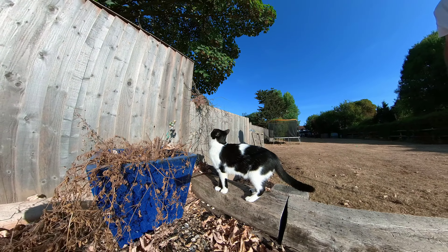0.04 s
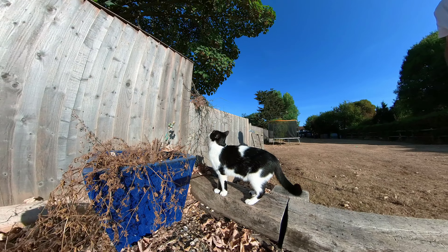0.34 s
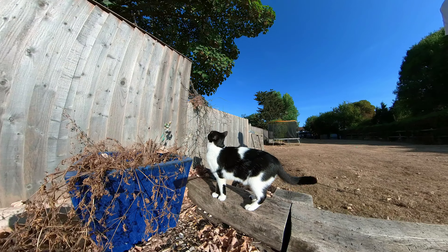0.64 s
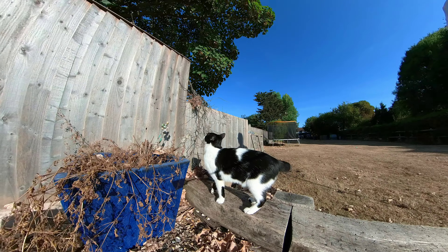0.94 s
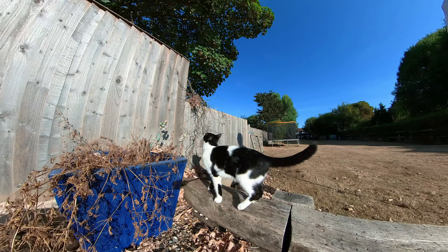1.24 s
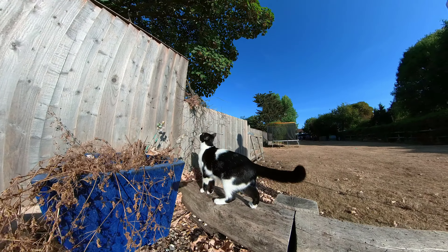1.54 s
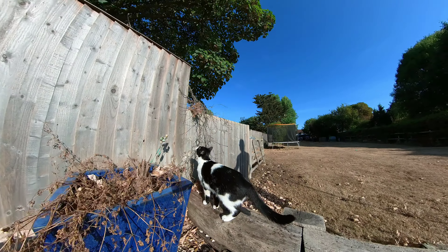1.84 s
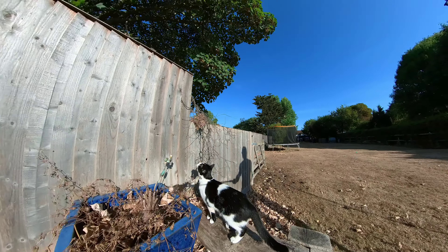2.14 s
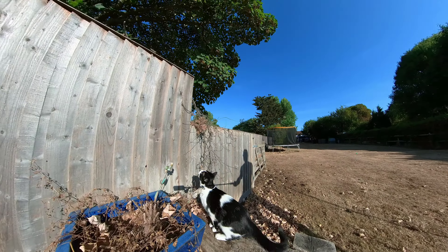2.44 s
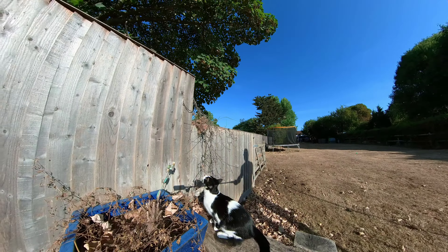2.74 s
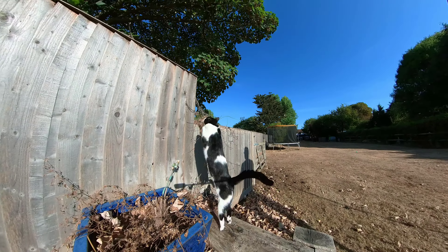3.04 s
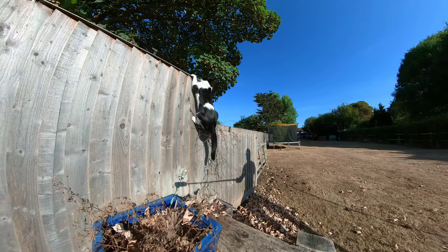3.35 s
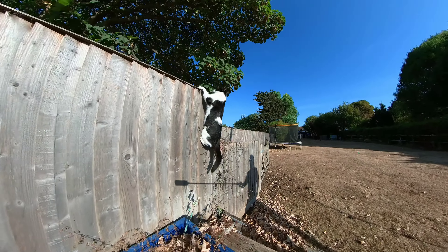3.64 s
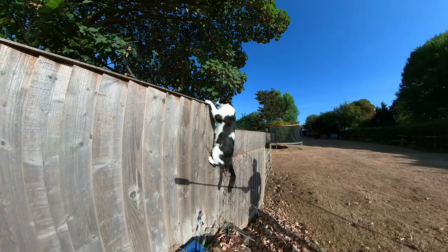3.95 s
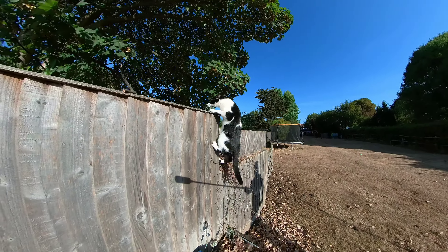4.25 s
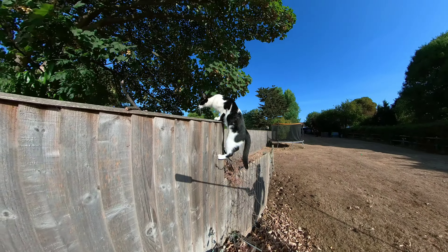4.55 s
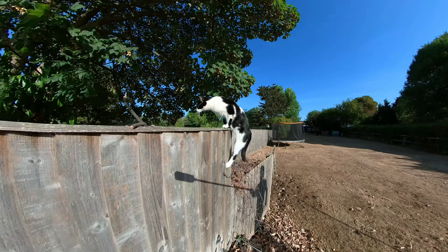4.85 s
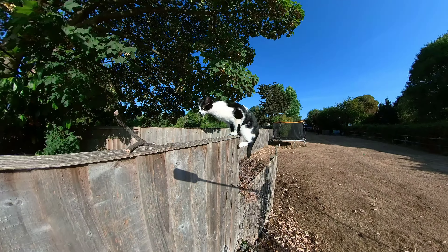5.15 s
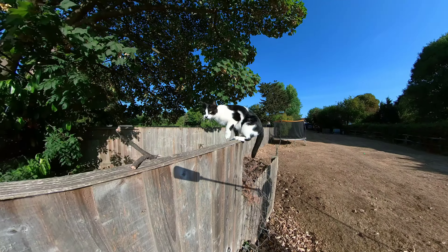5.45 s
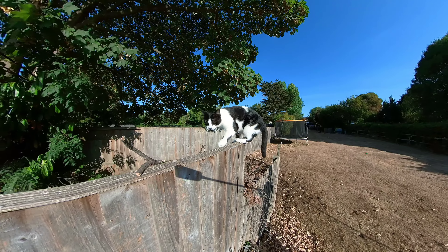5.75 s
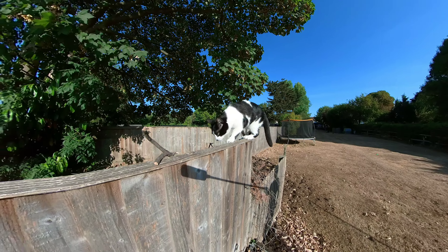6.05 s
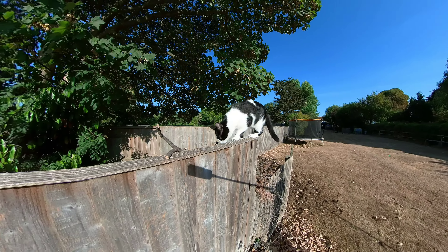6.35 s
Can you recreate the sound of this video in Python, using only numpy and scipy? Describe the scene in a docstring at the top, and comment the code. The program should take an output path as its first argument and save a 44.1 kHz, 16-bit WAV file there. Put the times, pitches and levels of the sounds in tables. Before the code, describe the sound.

In a quiet yard, a cat meows, chirps and climbs a board fence, claws scratching and paws thumping the loose wood.

```python
"""A cat in an open yard gives a long rising meow and a short chirp, then scrabbles up a board fence.
Its voice is a row of vocal-fold harmonics shaped by a moving mouth and a fixed throat.
Its claws catch and drag, snapping fibres of the dry wood, while its paws knock the loose boards.
The hand-held microphone rumbles and is bumped now and then; air and traffic murmur in the distance."""
import sys
import numpy as np
from scipy import signal
from scipy.fft import rfft, irfft
from scipy.io import wavfile
from scipy.ndimage import uniform_filter1d

SR = 44100
rng = np.random.default_rng(int(sys.argv[2]) if len(sys.argv) > 2 else 0)


def dump(signal):
    """Clip the signal to [-1, 1] and save it as 16-bit WAV at the path in sys.argv[1]."""
    limited = np.clip(np.atleast_2d(signal).T, -1, 1)
    pcm = np.round(limited * 32767).astype(np.int16)
    wavfile.write(sys.argv[1], SR, pcm)


N = 287034
TIME = np.arange(N) / SR


def from_db(db):
    """Decibels to gain."""
    return 10 ** (np.asarray(db) / 20)


def unit_rms(x):
    """Scale to an rms of 1."""
    return x / np.sqrt(np.mean(x ** 2) + 1e-20)


def peak_at(x, db):
    """Scale to a given peak level."""
    return from_db(db) * x / np.abs(x).max()


def curves(rows):
    """Each column after the time column, interpolated at every sample."""
    times, *columns = np.transpose(rows)
    return [np.interp(TIME, times, column) for column in columns]


def fade(t, t60):
    """Exponential decay, 60 dB down after t60 seconds."""
    return np.exp(-np.log(1000) * np.maximum(t, 0) / t60)


def envelope(t, attack_s, hold_s, t60):
    """Rise, hold, then die away."""
    return np.clip(t / attack_s, 0, 1) * fade(t - hold_s, t60)


def drift(rate_hz):
    """Smooth random wander with an rms of 1."""
    knots = rng.standard_normal(int(TIME[-1] * rate_hz) + 2)
    return unit_rms(np.interp(TIME * rate_hz, np.arange(len(knots)), knots))


def band(x, low_hz, high_hz, order=2):
    """Causal band-pass."""
    edges = [low_hz, np.clip(high_hz, low_hz + 10, SR / 2 - 10)]
    return signal.sosfilt(signal.butter(order, edges, "band", fs=SR, output="sos"), x + 1e-18)


def coloured(x, spectrum, size=8192):
    """Causal (minimum-phase) filter with the given spectrum and unit power gain."""
    hz, db = np.transpose(spectrum)
    bin_hz = np.arange(size // 2 + 1) * SR / size
    gain = unit_rms(from_db(np.interp(np.log(bin_hz + 1), np.log(hz), db)))
    cepstrum = irfft(np.log(gain))
    cepstrum[1:size // 2] *= 2
    cepstrum[size // 2 + 1:] = 0
    return signal.fftconvolve(x, irfft(np.exp(rfft(cepstrum))))[:len(x)]


def add(out, start_s, sound):
    """Mix a sound in at its start time."""
    at = int(start_s * SR)
    out[at:at + len(sound)] += sound[:N - at]


# Far murmur and thin hiss around the yard. Each row: frequency in Hz, relative level in dB.
AIR_COLOUR = [(120, -26), (280, -13), (400, -11.5), (540, -6), (760, -5), (1020, -9.5), (1300, -17),
              (1650, -32.5), (2200, -34), (4000, -34), (6000, -32.5), (7500, -40), (9400, -52),
              (12000, -79)]
# Traffic, a long way off, draws near and recedes. Each row: time in seconds, level in dB.
TRAFFIC_SWELL = [(0, -81.5), (2.6, -66.5), (5.2, -61), (6.5, -64)]

def air_and_traffic():
    """A steady murmur from beyond the yard, with traffic slowly swelling in its lower part."""
    traffic = unit_rms(band(rng.standard_normal(N), 368, 620))
    air = coloured(rng.standard_normal(N), AIR_COLOUR)
    return from_db(-66) * air + from_db(curves(TRAFFIC_SWELL)[0]) * traffic


# Bumps right on the microphone's handle. Each row: start in seconds, peak of the swing in dB.
HANDLE_BUMPS = [(0.244, -33), (.921, -34), (.961, -32.5), (1.522, -29.5), (1.617, -24), (1.709, -45),
                (1.755, -28.5), (1.812, -34.5), (2.224, -42.5), (3.35, -40), (4.9, -30.5), (5.571, -47),
                (6.143, -42)]
# The hand shifts its hold. Each row: middle in seconds, level in dB, half-length in seconds.
HAND_MOVES = [(1.655, -45.5, 0.11), (3.74, -52, 0.45), (4.82, -57.5, 0.31), (6.253, -54.5, 0.16)]
# Deep rumble, of the hand and of the fence panel. Each row: frequency in Hz, relative level in dB.
RUMBLE_COLOUR = [(11, -32.5), (18, -9), (38, -3), (86, -2.5), (124, -13.5), (157, -13.5), (188, -21),
                 (230, -23.5), (300, -37), (510, -120)]

def microphone_handling(spread=1.33, firm_db=-29.5):
    """Bumps swing the handle with a dull creak, over a rumble that grows as the hand moves."""
    out, push = np.zeros(N), signal.unit_impulse(SR // 4)
    for start, db in HANDLE_BUMPS:
        hz = 75.7 + 1.2 * (db - firm_db)   # firmer bumps swing faster
        swing = band(push, hz / spread, hz * spread, order=3)
        creak = band(rng.standard_normal(len(push)) * fade(TIME[:len(push)], .11), 135, 185, order=3)
        creak_db = db - 16 + 0.2 * min(db - firm_db, 0)
        add(out, start, peak_at(swing, db) + peak_at(creak, creak_db))
    still = from_db(-64.5)
    moving = sum(from_db(db) * np.exp(-((TIME - middle) / half) ** 2) for middle, db, half in HAND_MOVES)
    rumble_gain = np.hypot(still, moving) * from_db(drift(4.5))
    return out + rumble_gain * coloured(rng.standard_normal(N), RUMBLE_COLOUR)


# Small dry ticks over at the fence. Each row: start in seconds, peak in dB, lower and upper mode in Hz,
# upper mode's relative level in dB, t60 in seconds.
WOOD_TICKS = [(.681, -42, 800, 2120, -15.5, 0.015), (.72, -61.5, 1900, 4050, -4.5, .006),
              (5.545, -40, 1145, 2120, 4, 0.0085), (5.546, -50, 2460, 3343, 1, 0.015)]

def wood_ticks():
    """Light contacts ring two short modes, with a little grit between them."""
    out, t = np.zeros(N), TIME[:SR // 8]
    onset = (1 - fade(t, 0.036)) ** 2
    for start, db, low_hz, high_hz, high_db, t60 in WOOD_TICKS:
        ring = np.sin(2 * np.pi * low_hz * t) + from_db(high_db) * np.sin(2 * np.pi * high_hz * t)
        grit = 0.4 * band(rng.standard_normal(len(t)), low_hz, high_hz, order=4)
        add(out, start, peak_at((ring + grit) * fade(t, t60) * onset, db))
    return out


# Modes of the yard fence. Each row: frequency in Hz, relative level in dB, t60 in seconds.
FENCE_MODES = [(160, 8, 0.28), (261.7, 0, 0.41), (301.5, 4, 0.2), (380, -2.5, 0.23), (449, 2, 0.28),
               (568, -2.5, 0.13), (787, -6, 0.33), (865, -11, 0.07), (953, -3.5, 0.15), (1058, -15, 0.17),
               (1050, -12.5, 0.081), (1310, 1.5, 0.095), (1400, -3.5, 0.29), (1560, -3, 0.084),
               (1673, -3.5, 0.058), (1780, -12.5, 0.17), (2007, 3.5, 0.11)]

def fence_ring(crowd_db, crowd_t60):
    """One spot on the fence rings: its main modes plus a dense, short-lived crowd of others; energy 1."""
    t = TIME[:SR // 2]
    chance = rng.random((len(FENCE_MODES), 2))
    modes = sum(from_db(db) * (.5 + strength) * np.sin(2 * np.pi * (hz * t + turn)) * fade(t, t60)
                for (hz, db, t60), (strength, turn) in zip(FENCE_MODES, chance))
    ring = modes + from_db(crowd_db) * rng.standard_normal(len(t)) * fade(t, crowd_t60)
    return ring / np.linalg.norm(ring)


# Paws strike the fence. Each row: start in seconds, claw force in dB, claw t60 in seconds,
# knock peak in dB, centre of the knock's band in Hz.
PAW_STRIKES = [(.681, -76, 0.023, -50.5, 613), (3.379, -68, 0.18, -60, 500),
               (3.464, -38.5, 0.061, -41.5, 540), (3.491, -37.5, 0.064, -32, 352),
               (3.511, -52, 0.065, -32, 222), (3.548, -51, 0.036, -34.5, 300),
               (3.652, -57, .06, -31.5, 530), (3.686, -50, 0.092, -33.5, 338),
               (3.779, -47.5, 0.068, -47, 595), (3.802, -35.5, 0.059, -35.5, 950),
               (3.822, -41, 0.049, -33.5, 1030), (3.84, -51, 0.039, -45, 1000), (3.885, -54, .07, -36, 900),
               (3.915, -66, 0.064, -42.5, 365), (4.392, -37.5, 0.033, -37.5, 445),
               (4.418, -55, 0.078, -43, 464), (4.434, -47.5, 0.04, -46, 520), (4.488, -57.5, .06, -46, 567),
               (4.595, -74, 0.081, -40.5, 332), (4.649, -56.5, 0.12, -37.5, 503),
               (4.676, -42, 0.042, -34.5, 905), (4.686, -57, .05, -31.5, 430),
               (4.718, -49, 0.14, -35.5, 790), (4.915, -41, 0.012, -56, 550), (4.959, -47, 0.033, -47, 560),
               (4.983, -54, 0.18, -48, 630), (5.087, -65, 0.1, -55.5, 650), (5.415, -65.5, 0.1, -63, 1080),
               (5.544, -64, .11, -42.5, 547)]

def paw_knocks(spread=2.06):
    """A paw lands and the loose board chatters against its rail, ringing one band of the fence's modes."""
    out, t = np.zeros(N), TIME[:SR // 2]
    for start, _, _, db, hz in PAW_STRIKES:
        rattle_t60 = min(0.22 * (500 / hz) ** 1.55, .3)   # duller, heavier blows rattle longer
        chatter = 0.045 * rng.standard_normal(len(t)) * fade(t, rattle_t60)
        chatter[0] = 1   # the landing itself
        blow = signal.fftconvolve(chatter, fence_ring(crowd_db=28.5, crowd_t60=0.083))[:len(t)]
        add(out, start, peak_at(band(blow, hz / spread, hz * spread, order=3), db))
    return out


# Claws slide down the boards. Each row: start in seconds, force in dB, hold and t60 in seconds.
CLAW_SLIDES = [(3.441, -68, .02, .1), (3.526, -52, .19, 0.34), (3.866, -67, 0.039, 0.65),
               (3.886, -44, 0.0077, 0.053), (4.057, -73, 0.021, 0.13), (4.37, -67.5, 0.056, 1),
               (4.66, -41.5, 0.024, 0.075), (4.737, -55.5, 0.068, 0.27), (4.853, -61, .05, 0.45),
               (5.1, -87.5, 0.19, .4)]

def claw_force(snags_per_s=31, snag_db=4, snag_t60=.025):
    """At each strike the claws bite, slip briefly and let go; in between they slide and snag at random."""
    t = TIME[:SR // 3]
    snags = (rng.random(N) < snags_per_s / SR) * from_db(snag_db) ** 2
    uneven = 1 + signal.fftconvolve(snags, fade(t, snag_t60) ** 2)[:N]
    power = uneven * sum((from_db(db) * envelope(TIME - start, 0.0041, hold, t60)) ** 2
                         for start, db, hold, t60 in CLAW_SLIDES)
    for start, db, t60, _, _ in PAW_STRIKES:
        bite = from_db(db) * envelope(t, attack_s=0.00049, hold_s=0.041 * t60, t60=t60)
        add(power, start, bite ** 2)
    return np.sqrt(power)


def fibre_snaps(force, per_s, judder_db):
    """Wood fibres snap in uneven clumps; over a few milliseconds their strength follows the claw force."""
    clicks = (rng.random(N) < per_s / SR) * rng.standard_normal(N) * from_db(judder_db * drift(450))
    local_rms = np.sqrt(uniform_filter1d(clicks ** 2, size=260) + 1e-9)
    return force * clicks / local_rms


def wood_grain(clicks, t60, direct, size=768):
    """As the claws move on, every spot of the grain rings briefly in its own way."""
    window, t, out = np.hanning(size), TIME[:size // 2], np.zeros(N)
    for at in range(0, N - size, size // 2):
        ring = rng.standard_normal(len(t)) * fade(t, t60)
        ring /= np.linalg.norm(ring)
        ring[0] += direct
        add(out, at / SR, np.convolve(window * clicks[at:at + size], ring / np.linalg.norm(ring)))
    return out


# Scratching on the boards' face and up on their edge. Each row: frequency in Hz, relative level in dB.
FACE_COLOUR = [(530, -30), (900, -3.5), (1830, -2.5), (2160, -5.5), (2520, -1.5), (3200, -2.5),
               (4000, -0.5), (5650, 1.5), (7660, -4), (9410, -30.5), (12200, -57), (20700, -120)]
EDGE_COLOUR = [(530, -24), (900, -8), (1100, -4), (1880, -3), (2200, -2), (2310, -1), (3300, -1), (6170, 1),
               (8200, -13.5), (9410, -35), (12200, -66), (20700, -120)]

def claw_scratch(force, top_reached_s=4.2):
    """Dry snaps ring the grain; the colour changes as the cat reaches the top of the fence."""
    rasp = wood_grain(fibre_snaps(force, per_s=10000, judder_db=4.5), t60=0.013, direct=0.6)
    on_top = TIME > top_reached_s
    return coloured(rasp * ~on_top, FACE_COLOUR) + coloured(rasp * on_top, EDGE_COLOUR)


def resonance(hz, centre_hz, width_hz):
    """Gain of a steep-sided resonance, 1 on top."""
    return 1 / (1 + (2 * (hz - centre_hz) / width_hz) ** 2) ** 2


def fundamental_gain(start, db, swell_db_per_s, attack_s, hold_s, t60):
    """Strength of a call's lowest harmonic: it swells or sags steadily while held."""
    t = TIME - start
    return from_db(db + swell_db_per_s * np.clip(t, 0, hold_s)) * envelope(t, attack_s, hold_s, t60)


def cat_voice(pitch_curve, mouth_curve, throat_modes, fundamental, throat_db, effort_slope,
              jitter, shimmer, mouth_width_hz, flutter_db):
    """Vocal-fold harmonics glide through the moving mouth and fixed throat; effort brightens them."""
    start, end = pitch_curve[0][0], pitch_curve[-1][0]
    on = (TIME > start) & (TIME < end)
    pitch, mouth_hz, effort_db = (curve[on] for curve in curves(pitch_curve) + curves(mouth_curve))
    bright_db = throat_db + effort_slope * (effort_db - effort_db.max())
    phase = 2 * np.pi * np.cumsum(pitch * (1 + jitter * drift(180)[on])) / SR
    rasp = .35 * fade(TIME[on] - start, t60=.3)   # the voice starts rough, then settles
    out = np.zeros(N)
    out[on] = fundamental[on] * np.sin(phase)
    for k in range(2, 12):
        hz = k * pitch
        mouth = from_db(effort_db) * resonance(hz, mouth_hz, mouth_width_hz)
        throat = sum(from_db(db) * resonance(hz, centre, width) for centre, width, db in throat_modes)
        # the weak upper overtones come and go as the folds close unevenly
        throat *= from_db(bright_db + flutter_db * drift(30.3)[on])
        out[on] += np.hypot(mouth, throat) * np.sin(k * phase + rasp * drift(450)[on])
    edges = np.clip((TIME - start) / .004, 0, 1) * np.clip((end - TIME) / .045, 0, 1)
    return out * edges * (1 + shimmer * drift(70))


# The meow, out in the open yard. Each row: time in seconds, pitch in Hz.
MEOW_PITCH = [(1.49, 800), (1.555, 610), (1.615, 593), (1.7, 654), (1.95, 695.4), (2.05, 749),
              (2.146, 765.6), (2.162, 872), (2.26, 822)]
# The moving mouth. Each row: time in seconds, resonance in Hz, effort in dB.
MEOW_MOUTH = [(1.5, 1460, -67.5), (1.56, 1690, -56), (1.65, 1645, -58.5), (1.75, 1496, -53),
              (1.81, 1260, -63), (1.95, 1440, -53.5), (2.05, 1800, -50.5), (2.12, 1800, -53.5),
              (2.165, 1755, -73.5)]
# Upper throat resonances. Each row: centre in Hz, width in Hz, relative level in dB.
MEOW_THROAT = [(2120, 240, -5), (3030, 460, -7), (4480, 1020, 7.5), (6280, 580, -2)]

def meow():
    """A long, swelling call: the pitch dips, climbs slowly and breaks upward near the end."""
    swell = fundamental_gain(MEOW_PITCH[0][0], db=-69.5, swell_db_per_s=36,
                             attack_s=.01, hold_s=0.63, t60=0.58)
    return cat_voice(MEOW_PITCH, MEOW_MOUTH, MEOW_THROAT, swell, throat_db=-74, effort_slope=2.5,
                     jitter=0.0051, shimmer=0.049, mouth_width_hz=715, flutter_db=2.0)


# Fur and dry leaves, faint at the microphone. Each row: start in seconds, level in dB,
# low and high band edge in Hz, length in seconds.
SOFT_RUSTLES = [(2.223, -77.5, 2100, 2680, 0.12), (2.272, -78, 3520, 5490, 0.033),
                (2.929, -61, 3450, 6260, 0.031), (2.931, -73, 3100, 7000, 0.096),
                (5.485, -76.5, 1800, 2400, 0.088), (5.967, -77, 2740, 3160, .08)]

def rustles():
    """Fur and leaves stir in brief swells of narrow-band hiss."""
    out = np.zeros(N)
    for start, db, low_hz, high_hz, length in SOFT_RUSTLES:
        hiss = unit_rms(band(rng.standard_normal(SR // 4), low_hz, high_hz, order=3))
        swell = np.hanning(int(length * SR))
        add(out, start, from_db(db) * swell * hiss[:len(swell)])
    return out


# The chirp, just before the leap at the fence. Each row: time in seconds, pitch in Hz.
CHIRP_PITCH = [(2.909, 812), (2.938, 655), (2.987, 656), (3.003, 614), (3.06, 556), (3.11, 540)]
# The moving mouth. Each row: time in seconds, resonance in Hz, effort in dB.
CHIRP_MOUTH = [(2.911, 1560, -63), (2.924, 1390, -46), (2.942, 1420, -53.5), (2.985, 1450, -50.5),
               (3.005, 1390, -64), (3.1, 1650, -76)]
# Upper throat resonances. Each row: centre in Hz, width in Hz, relative level in dB.
CHIRP_THROAT = [(2815, 240, 9), (4570, 720, -6), (5870, 700, -6)]

def chirp():
    """A short, unsteady call that sags as its pitch falls in two steps."""
    sag = fundamental_gain(CHIRP_PITCH[0][0], db=-48.5, swell_db_per_s=-115,
                           attack_s=.002, hold_s=0.15, t60=0.22)
    return cat_voice(CHIRP_PITCH, CHIRP_MOUTH, CHIRP_THROAT, sag, throat_db=-65, effort_slope=1.5,
                     jitter=0.021, shimmer=0.29, mouth_width_hz=810, flutter_db=5.0)


# The fence takes the leap. Each row: start in seconds, peak in dB, frequency in Hz, t60 in seconds.
PANEL_SWAY = [(3.512, -25.5, 69.9, 0.32)]

def panel_sway():
    """The whole panel sways under the cat's weight, and a low shudder follows."""
    out, t = np.zeros(N), TIME[:SR // 2]
    for start, db, hz, t60 in PANEL_SWAY:
        sway = np.sin(2 * np.pi * hz * t) * fade(t, t60) * (1 - fade(t, 0.0094))
        shudder = coloured(rng.standard_normal(len(t)), RUMBLE_COLOUR)
        shudder *= envelope(t, attack_s=0.051, hold_s=0.051, t60=0.73)
        add(out, start, peak_at(sway, db) + from_db(db - 14) * shudder)
    return out


def yard(x, wet_db, t60):
    """The direct sound reaches the microphone, then faint scatter from the ground, boards and trees."""
    t = TIME[:SR // 2]
    tail = band(rng.standard_normal(len(t)), 230, 8600, order=1) * fade(t, t60) * (t > .004)
    return x + from_db(wet_db) * signal.fftconvolve(x, tail / np.linalg.norm(tail))[:N]


def scene():
    """Cat and fence are straight ahead of the microphone; only the scratching has a little width."""
    force = claw_force()
    claws = from_db(1.0) * claw_scratch(force)
    boards = from_db(-9.5) * signal.fftconvolve(claws, fence_ring(crowd_db=6.0, crowd_t60=0.087))[:N]
    climb = claws + boards + paw_knocks() + panel_sway() + wood_ticks() + rustles()
    mid = yard(meow() + chirp(), wet_db=-15.5, t60=0.2) + yard(climb, wet_db=-18.0, t60=0.18)
    mid += microphone_handling() + air_and_traffic()
    wide_snaps = coloured(fibre_snaps(force, per_s=7000, judder_db=3.0), FACE_COLOUR)
    side = from_db(-15.0) * band(wide_snaps, 2600, 6400, order=4)
    return np.array([mid + side, mid - side])


def record(dry, cutoff_hz=9600):
    """A steep low-pass takes the top off the microphone's signal."""
    return signal.sosfilt(signal.ellip(10, .2, 70, cutoff_hz, fs=SR, output="sos"), dry)


dry = scene()
out = record(dry)
dump(out)
```